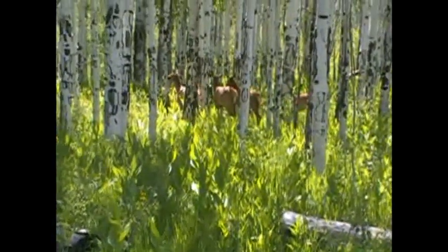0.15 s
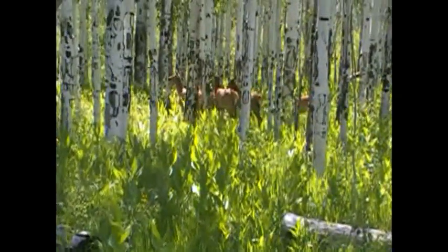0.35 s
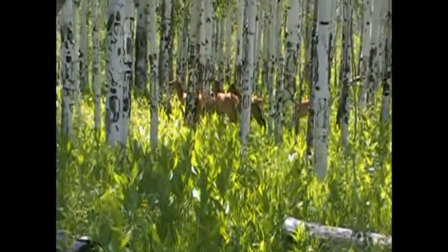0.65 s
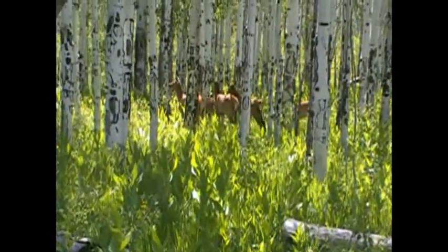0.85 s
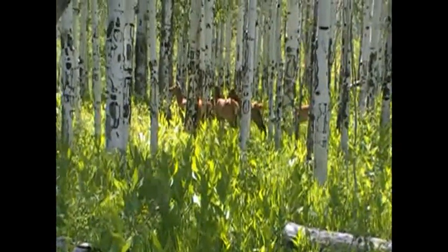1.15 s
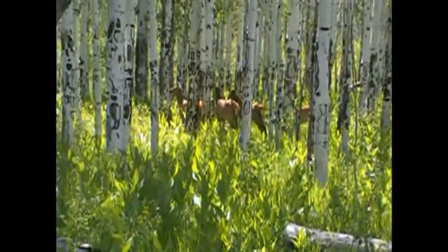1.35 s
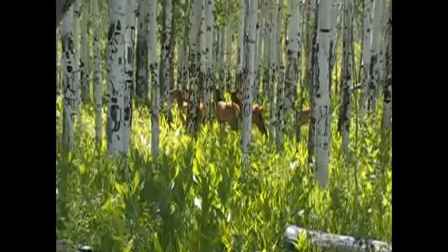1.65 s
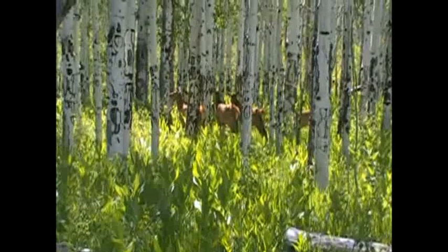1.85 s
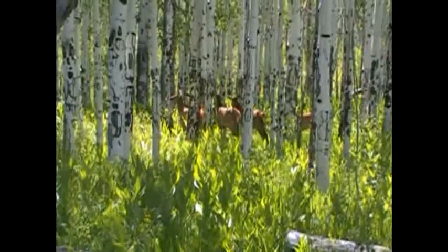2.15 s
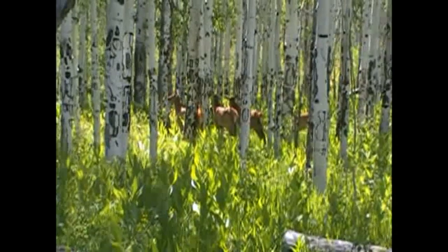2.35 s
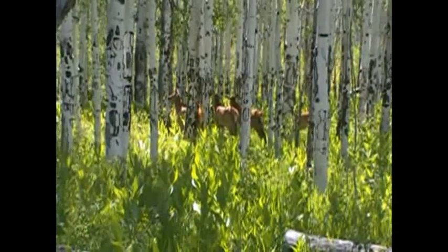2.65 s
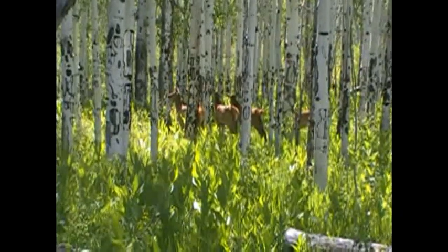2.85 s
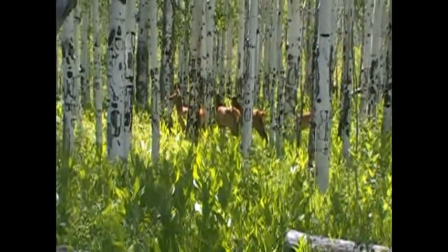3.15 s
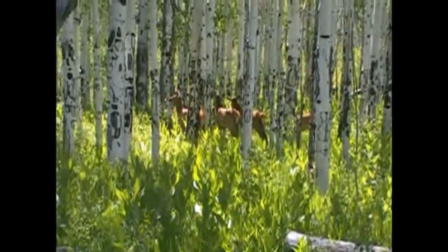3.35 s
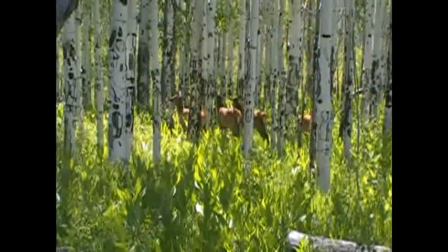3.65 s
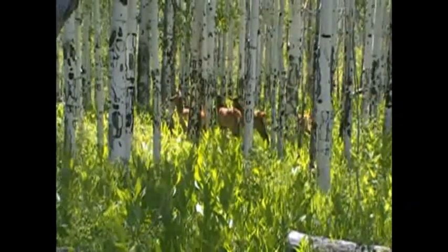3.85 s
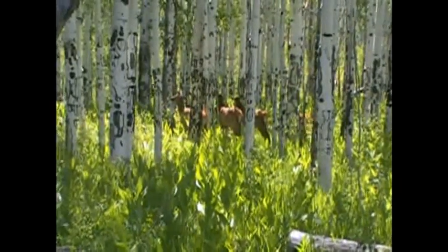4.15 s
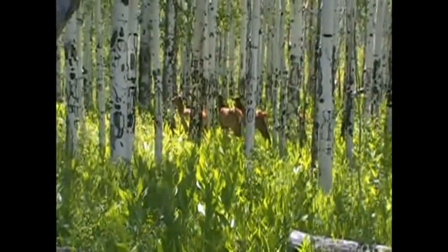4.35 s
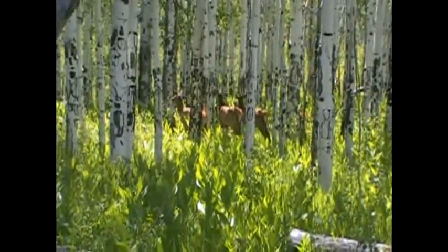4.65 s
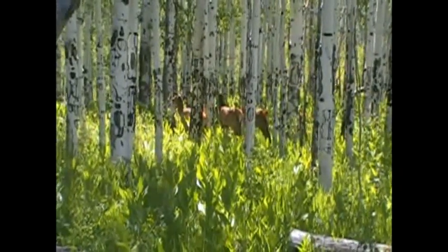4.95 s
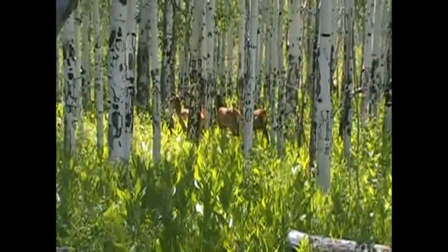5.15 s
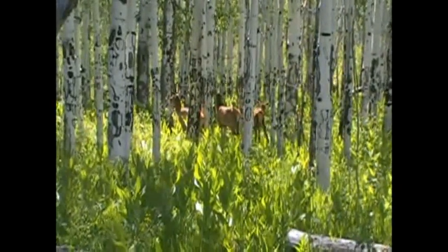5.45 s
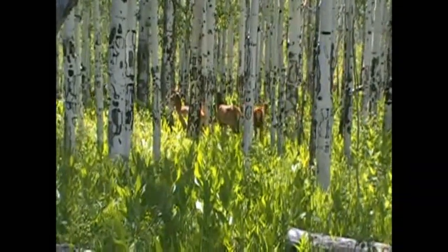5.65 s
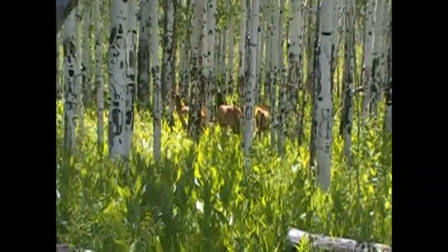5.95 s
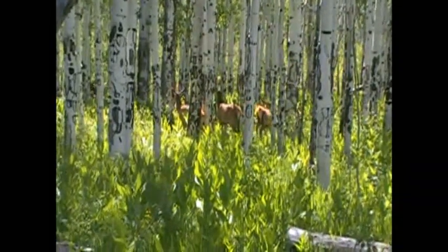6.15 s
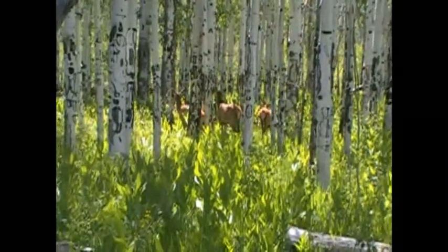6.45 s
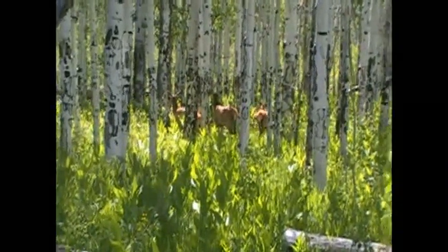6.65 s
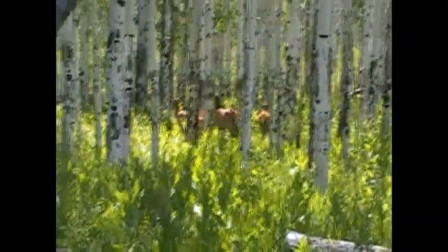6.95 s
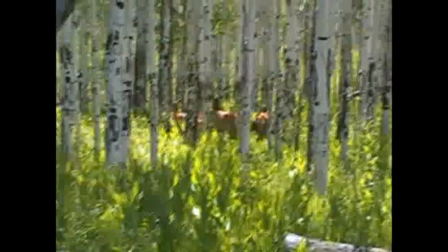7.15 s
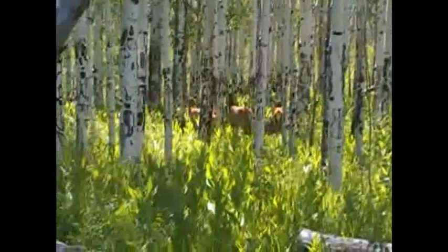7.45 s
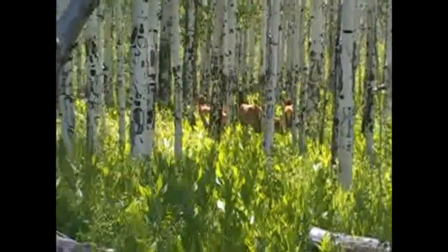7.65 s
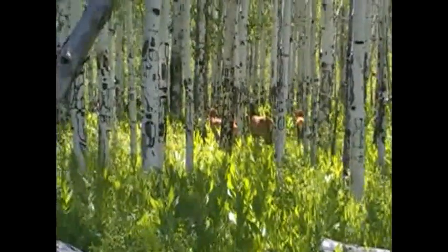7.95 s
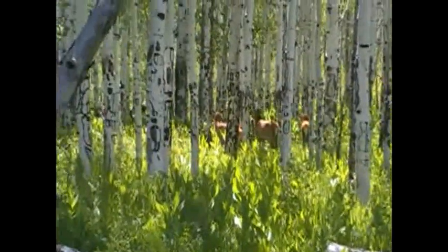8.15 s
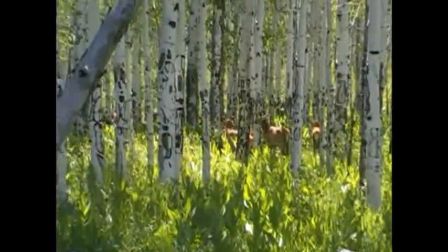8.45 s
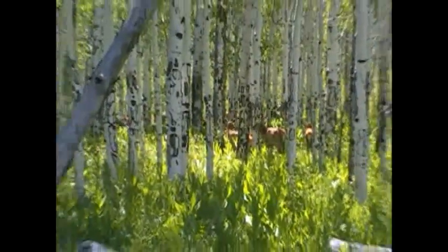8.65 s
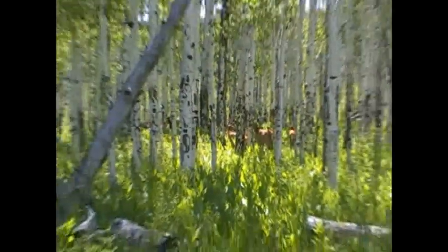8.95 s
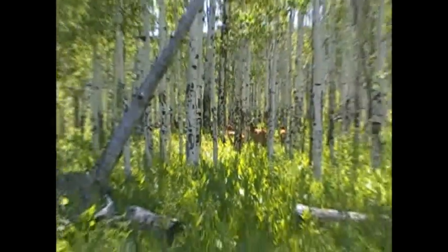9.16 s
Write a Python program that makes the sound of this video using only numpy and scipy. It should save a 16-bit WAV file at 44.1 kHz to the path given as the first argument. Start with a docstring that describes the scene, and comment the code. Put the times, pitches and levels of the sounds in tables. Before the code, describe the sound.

High-pitched elk mews and faint chirps echo among trees, with small twig snaps, a soft hiss and hollow handling knocks.

```python
"""First come hollow knocks and a rub from a hand on a camera, mostly on the left, over a soft hiss of
leaves and insects. Then a herd of elk mews in an aspen wood. Their vocal folds make clear calls that
hold a pitch, then slide down and turn rough as the folds go slack. The tree trunks scatter each call
into a long echo. Twigs snap under hooves, small chirps sound far off and the camera's casing ticks."""
import sys
import numpy as np
from scipy import signal
from scipy.io import wavfile
from scipy.ndimage import uniform_filter1d

SR = 44100
rng = np.random.default_rng(int(sys.argv[2]) if len(sys.argv) > 2 else 0)


def transcribe(signal):
    """Save signal, clipped to [-1, 1], as a 16-bit WAV file at the path in sys.argv[1]."""
    frames = np.atleast_2d(signal).T
    limited = np.clip(frames, -1, 1)
    pcm = np.round(limited * 32767).astype(np.int16)
    wavfile.write(sys.argv[1], SR, pcm)


N = 410130

# tone of the leaf and microphone hiss: (frequency [Hz], relative level [dB])
LEAF_TONE = [(12, -64), (20, -8), (116, 0.5), (204, -2.5), (310, -3), (1150, -5.5), (1910, -13.5),
             (3160, -10.5), (4300, -20.5), (5680, -14.5), (6360, -20), (9400, -28), (10200, -34),
             (11800, -20.5), (16000, -59.5)]
# pulsing insect sounds: (centre [Hz], width [Hz], level [dB])
INSECT_BANDS = [(5650, 230, -70.5), (2980, 140, -85)]
# low rumble of the breeze: (time [s], level [dB])
BREEZE_LEVELS = [(0, -80), (4, -72), (5.5, -63), (8, -62), (9.3, -70)]
# how alike a hiss is on both sides: (frequency [Hz], likeness [0 to 1])
HISS_LIKENESS = [(60, 0.9), (240, 0.97), (950, 0.94), (3770, 0.97), (15000, 0.8)]
# how far a hiss leans left: (frequency [Hz], left over right [dB])
HISS_LEAN = [(60, 2), (180, 6.6), (550, 5.8), (1650, 2), (4970, 2.0), (15000, 1.5)]
# the hand shifting on the camera: (time [s], rub level [dB], rustle level [dB])
HAND_MOVES = [(0, -49.5, -56.5), (.25, -61, -64), (0.502, -102, -94), (3.5, -105, -61), (4.202, -62.5, -60),
              (4.601, -57, -50.5), (5.2, -68, -61), (5.5, -67, -56.5), (6.25, -61.5, -60),
              (6.5, -56.5, -47.5), (6.999, -51, -54.5), (7.4, -53.5, -56.5), (7.6, -75, -57),
              (7.85, -60, -53.5), (8.2, -67, -55.5), (8.5, -58, -56), (8.9, -64, -54.5), (9.3, -66, -60)]
# tone of the skin's rustle: (frequency [Hz], relative level [dB])
RUSTLE_TONE = [(200, -40.5), (1200, -4), (2600, -10), (4500, -14.5), (5600, -12.5), (9400, -20.5),
               (10300, -27.5), (12300, -25), (15000, -61)]
# knocks on the camera body: (time [s], level [dB], pitch [Hz], left over right [dB])
BODY_KNOCKS = [(0.028, -38.5, 798, 15.5), (0.069, -44, 815, 11), (0.172, -38, 813, 3), (1.237, -34, 755, 8),
               (3.176, -29.5, 860, 9), (4.595, -31, 890, 7), (5.139, -23.5, 913, 8.5),
               (5.439, -38, 667, 3.5), (6.0, -38, 950, 8.5), (6.782, -32, 810, 7), (7.08, -66, 870, -5),
               (7.268, -33.5, 885, 7.0), (7.363, -41, 1030, 11), (7.668, -31, 824, 9), (7.706, -33, 850, 8),
               (7.724, -37, 810, 9), (7.792, -30, 735, 6.5), (7.825, -38, 694, 7), (8.347, -38.5, 910, 4.0),
               (8.486, -39.5, 790, 9), (8.748, -33, 800, 8.0), (8.937, -31.5, 780, 7),
               (9.07, -42, 840, 6.5)]
# ticks and scrapes of the casing: (time [s], level [dB], left over right [dB], length [s])
CASING_TICKS = [(3.18, -59, 0, 0.0073), (4.069, -61, 15, 0.0046), (4.114, -54, -3, 0.0052),
                (4.192, -62, -7, 0.0056), (4.446, -64, 2, 0.025), (5.138, -44.5, 4, 0.0037),
                (6.008, -59, 3, .005), (6.024, -46, 4, 0.031), (6.106, -54.5, 5, 0.01),
                (6.78, -62, 4, 0.0045), (7.36, -54, 4, 0.0054), (7.439, -57, 4, 0.0051),
                (7.714, -53, 3, .008), (7.791, -40.5, 4, 0.004), (7.993, -57, 7, 0.013),
                (8.064, -45, 8, 0.0026), (8.149, -52, 4, 0.0042), (8.489, -38, 8, 0.0042),
                (8.617, -56, 3, 0.077), (9.032, -44, 2, 0.0032)]
# how long the far wood echoes: (frequency [Hz], time to fade by 60 dB [s])
ECHO_TIMES = [(800, 3.7), (1500, 1.95), (3000, 1.51), (6000, 0.74), (12000, 1.5)]
# tone of the echo: (frequency [Hz], relative level [dB])
ECHO_TONE = [(600, -6), (1500, -2), (2700, 4), (4000, 5.5), (6000, 14), (12000, -9)]
# distant chirps: (time [s], length [s], start pitch [Hz], end pitch [Hz], level [dB])
FAR_CHIRPS = [(1.235, 0.051, 2760, 3040, -52.5), (1.317, 0.043, 2390, 2220, -62),
              (1.406, 0.038, 2850, 2630, -56.5), (1.831, 0.038, 2910, 3140, -54),
              (4.108, .05, 6770, 7460, -62), (4.199, .065, 7580, 5370, -67), (4.36, 0.041, 7460, 5430, -70),
              (4.438, 0.038, 7000, 5300, -60), (5.372, 0.093, 2730, 2340, -49.5),
              (7.461, 0.046, 2840, 2690, -57), (7.53, 0.059, 2430, 2630, -58),
              (8.097, 0.027, 2790, 2660, -48), (8.582, 0.065, 2800, 2450, -50.5),
              (8.727, 0.04, 2920, 2760, -49), (8.735, .045, 3490, 3150, -51), (8.9, 0.13, 2780, 2370, -57),
              (8.954, 0.071, 3000, 2370, -49.5), (9, 0.045, 2950, 2340, -51.5),
              (6.389, 0.16, 2260, 2500, -55), (8.85, 0.11, 2630, 2440, -69),
              (9.278, 0.037, 2680, 2680, -56)]
# snapping twigs: (time [s], level [dB], centre [Hz], time to fade by 30 dB [s])
TWIG_SNAPS = [(0.395, -46, 1997, 0.045), (1.24, -51, 1490, 0.0093), (2.197, -48.5, 1080, 0.081),
              (3.772, -36.5, 700, 0.016), (4.065, -47, 598, 0.038), (4.449, -40.5, 2640, 0.027),
              (5.795, -47, 1000, 0.11), (5.837, -43, 1170, 0.091), (6.104, -39, 1520, 0.06),
              (6.686, -35.5, 570, 0.019), (7.022, -50, 2000, 0.019), (7.276, -54, 1290, 0.04),
              (7.376, -49, 1150, 0.095), (9.268, -46.5, 1250, 0.089)]
# how an elk's throat shapes its voice: (frequency [Hz], gain [dB])
THROAT_TONE = [(700, -31.5), (1100, -6.5), (1500, -3), (2100, -5.5), (2600, 0), (3300, 5.5), (3800, -7.5),
               (4500, -7), (6000, -13.5), (7500, -17), (9000, -27.5), (12000, -11), (16000, -50.5)]
# One elk call a row. Harmonics are tones at 1, 2, 3... times the pitch.
# (treble dulling [dB per kHz], throat length [1 = average], boost of even harmonics from 4 up [dB], curve)
# curve: (time [s], pitch [Hz], effort [dB], lift of the first harmonic [dB])
# The lift is high while the mouth is nearly shut and sinks as it opens.
ELK_MEWS = [ (1, 0.96, .2, [(-.45, 1498, -39, 18), (-.35, 1479, -40, 18), (-.2, 850, -33, 5)]),
            (0.6, 0.87, 4, [(2.4, 1920, -56, -10), (2.41, 1890, -61, -13), (2.417, 1570, -49, -3),
            (2.45, 1566, -33.5, -3.5), (2.459, 1400, -38.5, 11), (2.463, 1350, -50, 0)]),
            (.5, 0.96, -7, [(2.463, 1657, -39, -10), (2.476, 1484, -32, 4), (2.488, 1486, -22.5, 7.5),
            (2.51, 1480, -22, 8), (2.545, 1480, -27, 9), (2.572, 1471, -27, 2), (2.59, 1380, -23.5, -19),
            (2.615, 1210, -33.5, -17), (2.65, 1043, -44, 0), (2.72, 780, -60, 1)]),
            (0.3, 0.89, -1.5, [(2.68, 1443, -52, 13), (2.714, 1400, -37.5, -1), (2.756, 1407, -39.5, 0),
            (2.774, 1415, -35, -8), (2.804, 1186, -45.5, 12.5), (2.828, 1058, -41, 4),
            (2.91, 756, -47, -8)]), (1, 0.88, 0.9, [(3.58, 1297, -67, -7), (3.628, 1376, -36, 3),
            (3.696, 1425, -26.5, -0.5), (3.734, 1403, -29, 7), (3.8, 1352, -35.5, -9),
            (3.836, 1112, -37.5, 5), (3.93, 828, -48, 2)]), (1.1, 0.97, -3, [(3.71, 1405, -28, -5),
            (3.75, 1452, -32.5, 21), (3.78, 1474, -35.5, 22.5), (3.824, 1470, -23, 1),
            (3.842, 1368, -25.5, -23), (3.868, 1327, -28.5, -9), (3.98, 888, -49.5, 6)]),
            (1, 0.88, -0.4, [(4.51, 1361, -58, 8), (4.55, 1366, -34, -6), (4.588, 1392, -32, 2.5),
            (4.69, 1380, -24, -6.5), (4.708, 1362, -36, -8.5), (4.748, 1132, -34.5, 8),
            (4.802, 922, -40.5, 12), (4.85, 843, -43, 7), (4.9, 744, -46, 21)]),
            (21, 1.3, -9, [(4.51, 1026, -71, 15), (4.534, 1170, -49, 2), (4.554, 1336, -61, 7),
            (4.61, 1340, -57, 2)]), (2, 1.01, -1, [(4.62, 1385, -28, -20), (4.632, 1410, -51, -18),
            (4.658, 1540, -51, 0), (4.71, 1460, -53, -4)]), (3, 1.067, 3, [(4.89, 1528, -51, 11),
            (4.91, 1473, -40, 3), (4.935, 1415, -37, 13.5), (4.965, 1397, -29, 13), (5.0, 1393, -28.5, 2),
            (5.015, 1320, -29, -6), (5.04, 1190, -42, -6), (5.08, 984, -46, -1), (5.12, 867, -55, 17)]),
            (17, 0.82, 3, [(5.16, 1008, -58, -1), (5.25, 1112, -52, -15), (5.336, 997, -66, -20),
            (5.368, 874, -54, -2), (5.38, 894, -47, 26)]), (4, 1.08, 4, [(5.68, 1320, -72, 27),
            (5.736, 1426, -52, -11), (5.842, 1480, -58, 10), (5.894, 1346, -47, 0), (5.918, 1244, -55, 9),
            (5.964, 992, -50.5, 2), (6.05, 832, -56, -1)]), (3, .93, -3, [(6.14, 1810, -72, 14),
            (6.18, 1759, -40, -1), (6.206, 1769, -43, 1), (6.24, 1670, -46, -7), (6.304, 1220, -62, 12),
            (6.35, 1160, -61, 11)]), (2.5, .97, -5, [(6.38, 1360, -61, 14.5), (6.455, 1460, -61.5, 24),
            (6.475, 1473, -33.5, 0), (6.53, 1480, -31.5, -12), (6.555, 1354, -41.5, 12.5),
            (6.585, 1283, -37, 14), (6.62, 1156, -41, -2), (6.67, 960, -56, 19)]),
            (6, .94, 5, [(6.79, 797, -50, 4), (6.816, 860, -60, 4), (6.85, 1000, -54, 8),
            (6.9, 1053, -46, -17), (6.952, 996, -51, -35), (6.986, 838, -54, 1), (7.01, 743, -87, 22)]),
            (5, 1.114, -4, [(7.58, 1040, -57, 6), (7.624, 1315, -52.5, -8), (7.702, 1450, -54.5, 9.5),
            (7.848, 1515, -41.5, -15), (7.912, 1490, -58.5, 10), (7.962, 1398, -50.5, 4),
            (8.054, 1117, -35, -14), (8.1, 1006, -45.5, -16), (8.138, 790, -44, 3), (8.16, 674, -56, -1)]),
            (8, 1.25, -4, [(7.69, 941, -73, 14), (7.722, 1013, -70, 22), (7.77, 1102, -55, 9.5),
            (7.81, 1070, -56, 3), (7.964, 936, -48.5, -1), (7.99, 881, -68, 11)]),
            (1.1, 0.887, 0.5, [(8.02, 1116, -37, 9), (8.045, 1190, -50.5, -10), (8.1, 1360, -52.5, 1),
            (8.17, 1350, -50, 6), (8.222, 1222, -56, 11), (8.27, 932, -45, 5), (8.334, 692, -62, 8),
            (8.35, 710, -64, -1)]), (9, .92, -9, [(8.46, 740, -66, 7), (8.496, 757, -49.5, 10),
            (8.572, 710, -56, 2), (8.6, 664, -51, 8)]), ]
# how well the microphone hears each frequency: (frequency [Hz], gain [dB])
MICROPHONE_TONE = [(20, -15.5), (50, -1.5), (9500, 0.5), (11000, -10.5), (13000, -19), (16000, -17)]

TOP_HZ = 16300  # upper limit of the sound
LEAD_S = .5  # head start, so a call made just before time 0 still leaves its echo


def amp(db):
    """Turns decibels into a number to multiply by."""
    return 10 ** (np.asarray(db) / 20)


def evened(x):
    """Scales a signal to an average strength (rms) of 1."""
    return x / np.sqrt(np.mean(x ** 2) + 1e-20)


def read(table, hz):
    """Looks up a value between a table's rows, on a log-frequency scale."""
    row_hz, value = np.transpose(table)
    return np.interp(np.log(hz + 1), np.log(row_hz + 1), value)


def add(mix, start_s, sound):
    """Mixes a sound in at the given time."""
    part = mix[..., round(start_s * SR):][..., :sound.shape[-1]]
    part += sound[..., :part.shape[-1]]


def pan(db):
    """Two gains that make the left side db louder than the right."""
    return amp([[db / 2], [-db / 2]])


def band(x, hz, width, passes=1):
    """Keeps the sound around hz, at strength 1; more passes cut the rest harder."""
    for _ in range(passes):
        x = evened(signal.lfilter(*signal.iirpeak(hz, hz / width, SR), x))
    return x


def drift(seconds):
    """A random wander as long as the scene; more seconds make it slower."""
    size = round(seconds * SR)
    return evened(uniform_filter1d(uniform_filter1d(rng.standard_normal(N), size), size))


def flutter(size, seconds):
    """A quick, smooth random wobble for one short sound."""
    smooth = signal.windows.hann(round(2 * seconds * SR))
    return evened(signal.oaconvolve(rng.standard_normal(size), smooth, "same"))


def hiss(tone, patchy_db):
    """Stereo noise with the given tone, in drifting louder and softer patches."""
    frames, hz = N // 256 + 5, np.fft.rfftfreq(1024, 1 / SR)
    a, b, c, d, patches = rng.standard_normal((frames, 513, 5)).T
    patches = evened(uniform_filter1d(uniform_filter1d(patches, 12, 0), 14, 1))
    likeness = np.clip(read(HISS_LIKENESS, hz), 0, 1)[:, None]
    left = a + 1j * b
    right = likeness * left + np.sqrt(1 - likeness ** 2) * (c + 1j * d)
    lean = amp(read(HISS_LEAN, hz) / 2)[:, None]
    spectra = np.array([left * lean, right / lean])
    spectra *= amp(read(tone, hz)[:, None] + patchy_db * patches)
    return evened(signal.istft(spectra, nperseg=1024, noverlap=768)[1][:, :N])


def air():
    """Leaves and the microphone hiss, insects pulse and a breeze rumbles."""
    insects = sum(amp(db + 4.5 * drift(.012)) * band(rng.standard_normal(N), hz, width, passes=2)
                  for hz, width, db in INSECT_BANDS)
    breeze_db = np.interp(np.arange(N) / SR, *np.transpose(BREEZE_LEVELS))
    breeze = amp(breeze_db) * band(rng.standard_normal(N), hz=150, width=200, passes=2)
    leaves = amp(-52.5) * hiss(LEAF_TONE, patchy_db=1.4)
    return leaves + insects * pan(2) + breeze * pan(5)


def rubbing():
    """Skin slides on the camera with a hollow rub and a fine rustle."""
    times, *levels = np.transpose(HAND_MOVES)
    rub_db, rustle_db = (np.interp(np.arange(N) / SR, times, db) for db in levels)
    rub = band(rng.standard_normal(N), hz=830, width=420, passes=2) * amp(rub_db + 1.1 * drift(.024))
    rustle = hiss(RUSTLE_TONE, patchy_db=3) * amp(rustle_db + 2.6 * drift(.0026))
    return rub * pan(6.4) + rustle


def knocks():
    """Each knock of the hand makes the hollow camera body ring briefly."""
    out, t = np.zeros((2, N)), np.arange(round(.12 * SR)) / SR
    rise_s, ring_s = .00022, .035
    for start_s, db, hz, pan_db in BODY_KNOCKS:
        level = amp(db - 1.5 - 60 * t / ring_s) * (1 - np.exp(-t / rise_s))
        add(out, start_s, level * np.sin(2 * np.pi * hz * t) * pan(pan_db))
    return out


def ticks():
    """The casing ticks and scrapes in tiny bursts of bright noise."""
    out, t = np.zeros((2, N)), np.arange(round(.12 * SR)) / SR
    for start_s, db, pan_db, length in CASING_TICKS:
        shared, spread = rng.standard_normal((2, len(t)))
        noise = np.array([shared + .26 * spread, shared - .12 * spread])
        age = 4 * t / length  # the burst is loudest at age 1
        level = amp(db) * age * np.exp(1 - age)
        add(out, start_s, level * band(noise, hz=7900, width=6000, passes=3) * pan(pan_db))
    return out


def trunk_echo(x):
    """Trunks scatter a sound into many small echoes; each frequency fades at its own speed."""
    echoes = np.zeros((2, 2 * SR))
    delays = np.arange(200, 2 * SR - 20, 20)
    delays = delays + rng.integers(0, 20, (2, len(delays)))
    np.put_along_axis(echoes, delays, rng.choice([-1., 1.], delays.shape), 1)
    shared, spread = echoes
    sides = np.array([shared + .18 * spread, shared - .037 * spread])  # close microphones hear alike
    hz, t, spectra = signal.stft(sides, SR, nperseg=256)
    fade_s = read(ECHO_TIMES, hz)[:, None]
    fade = amp(-60 * t / (.16 * fade_s)) + amp(-23.5 - 60 * t / fade_s)  # near trunks + far wood
    tone = amp(read(ECHO_TONE, hz))[:, None]
    build_up = 1 - np.exp(-t / .04)
    tail = signal.istft(spectra * fade * tone * build_up, SR, nperseg=256)[1]
    return signal.fftconvolve(x[None], tail / np.linalg.norm(tail[0]), axes=1)[:, :len(x)]


def swayed(echo, samples=2.5):
    """Swaying trunks and leaves shift the echo paths a little, which blurs held tones."""
    shifted = np.arange(N) + samples * drift(.014)
    return np.array([np.interp(shifted, np.arange(N), side) for side in echo])


def chirps():
    """Gliding, slightly hoarse tones sound far off, and the trunks echo them like the calls."""
    out = np.zeros(N)
    for start_s, length, start_hz, end_hz, db in FAR_CHIRPS:
        size = round(length * SR)
        hz = np.linspace(start_hz, end_hz, size) * (1 + .012 * flutter(size, .003))
        level = amp(db + 4.4 * flutter(size, .0068)) * signal.windows.tukey(size, .7)
        add(out, start_s, level * np.sqrt(2) * np.sin(2 * np.pi * np.cumsum(hz) / SR))
    return out + amp(-7) * trunk_echo(out)


def twig_snap(db, hz, fade_s):
    """A twig breaks under a hoof: a crack of noise that dies quickly."""
    t = np.arange(round(.12 * SR)) / SR
    crack = band(rng.standard_normal(len(t)), hz, width=.31 * hz)
    return amp(db - 30 * t / fade_s) * band(crack, hz, width=3.7 * hz)


def mew(dull_db_per_khz, throat_length, even_db, curve):
    """An elk's vocal folds send harmonics through its throat, rougher and duller as the pitch falls."""
    throat_peak_hz, slack_dull_db, overtone_share = 3200, 14, .19
    times, *columns = np.transpose(curve)
    t = np.arange(times[0], times[-1], 1 / SR)
    size = len(t)
    hz, effort_db, lift_db = (np.interp(t, times, column) for column in columns)
    hz = uniform_filter1d(hz, round(.008 * SR), mode="nearest")  # rounds the corners of the pitch
    slack = np.clip(.93 - hz / hz.max(), 0, 1)  # 0 near the top pitch, grows as the folds loosen
    pitch_wobble = (.0012 + .056 * slack) * flutter(size, .0046)
    cycles = np.cumsum(hz * (1 + pitch_wobble)) / SR
    voice = np.zeros(size)
    for k in range(1, 13):  # harmonic number
        db = effort_db + read(THROAT_TONE, k * hz * throat_length)
        db -= slack_dull_db * slack * max(k - 2, 0)
        db -= dull_db_per_khz * np.maximum(k * hz - throat_peak_hz, 0) / 1000
        if k == 1:
            db += lift_db
        elif k > 2:
            db += overtone_share * lift_db + even_db * (k % 2 == 0)
        db += (.4 + 15 * slack) * flutter(size, .0067)  # roughness
        db += .35 * k * flutter(size, min(.02, size / SR / 4))  # slower wavering
        voice += amp(db) * (k * hz < TOP_HZ) * np.sin(2 * np.pi * k * cycles + k)
    return np.sqrt(2) * voice * signal.windows.tukey(size, .04)


def herd():
    """Elk call from three places, each with its own echo; twigs snap at one of them."""
    places = np.zeros((3, N + round(LEAD_S * SR)))
    for i, (*voice, curve) in enumerate(ELK_MEWS):
        add(places[i % len(places)], curve[0][0] + LEAD_S, mew(*voice, curve))
    for start_s, *snap in TWIG_SNAPS:
        add(places[1], start_s + LEAD_S, twig_snap(*snap))
    echoes = sum(swayed(trunk_echo(place)[:, -N:]) for place in places)
    return places.sum(0)[-N:] + amp(-8) * echoes


def scene():
    """Mixes the animals, a little to the left, with the hand noises and the air."""
    return (herd() + chirps()) * pan(1.8) + knocks() + ticks() + rubbing() + air()


def record(dry):
    """The microphone softens the deepest bass and the high treble; the very top is cut off."""
    hz = np.linspace(0, SR / 2, 513)
    microphone = signal.firwin2(1023, hz, amp(read(MICROPHONE_TONE, hz)), fs=SR)
    top_cut = signal.firwin(511, TOP_HZ, window=("kaiser", 9), fs=SR)
    heard = signal.oaconvolve(dry, microphone[None], "same")
    return signal.oaconvolve(heard, top_cut[None], "same")


dry = scene()
out = record(dry)
transcribe(out)
```